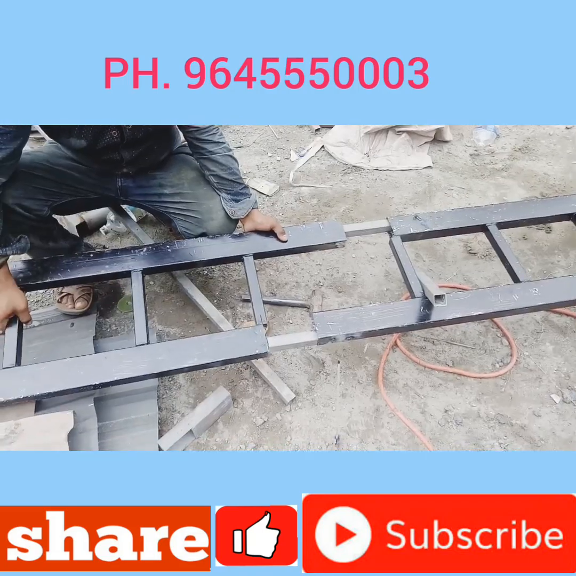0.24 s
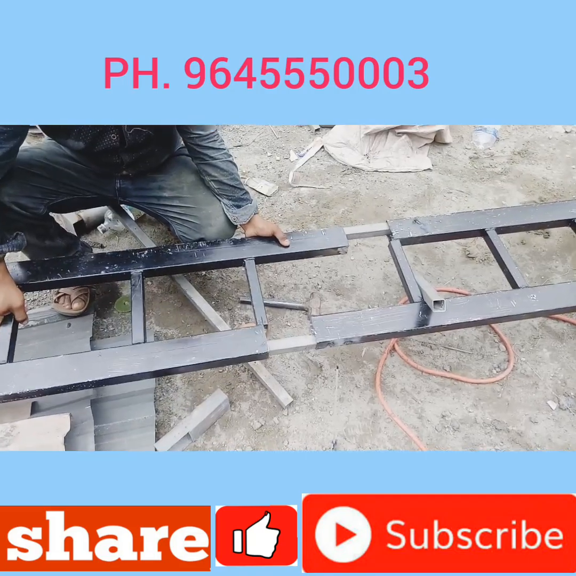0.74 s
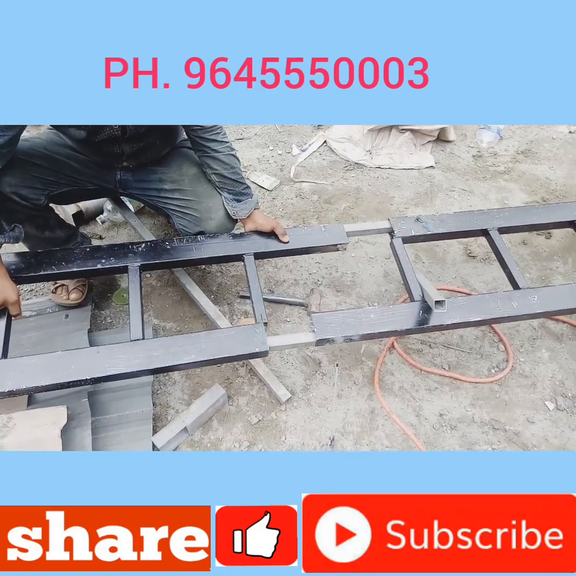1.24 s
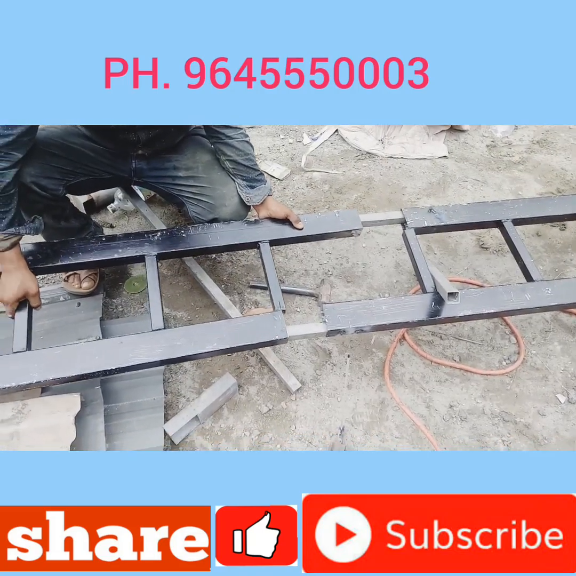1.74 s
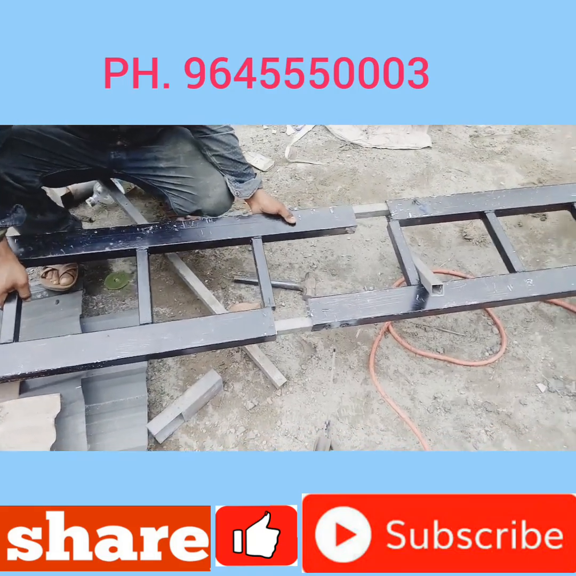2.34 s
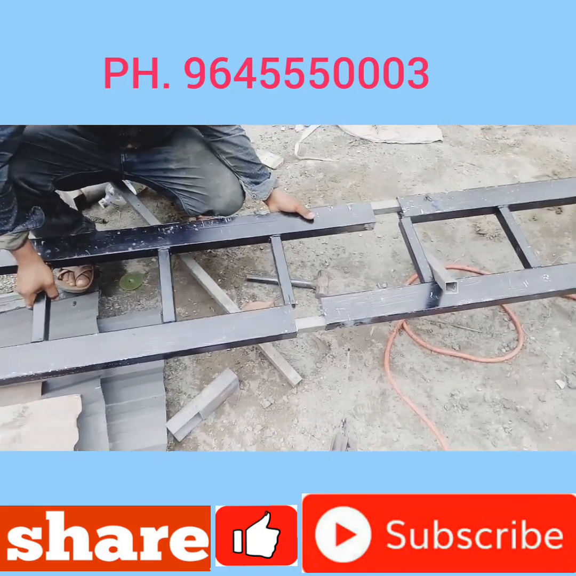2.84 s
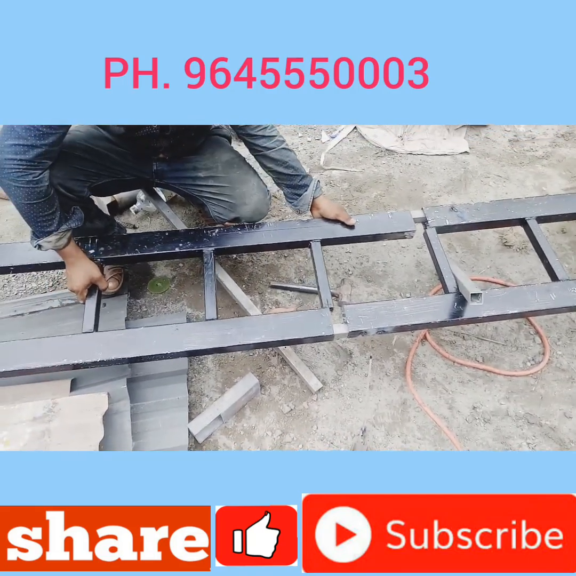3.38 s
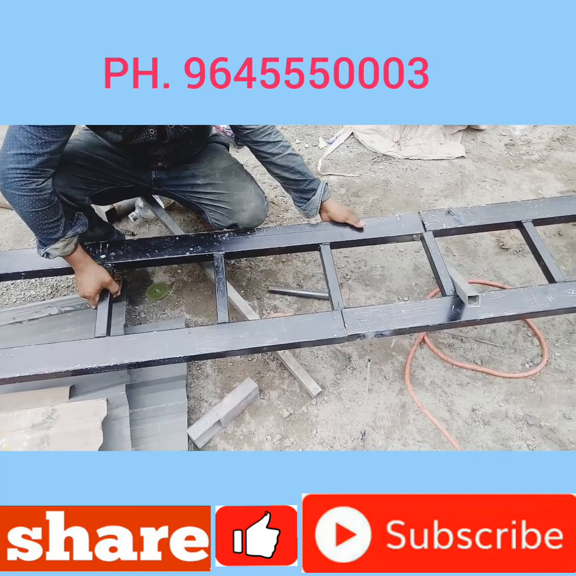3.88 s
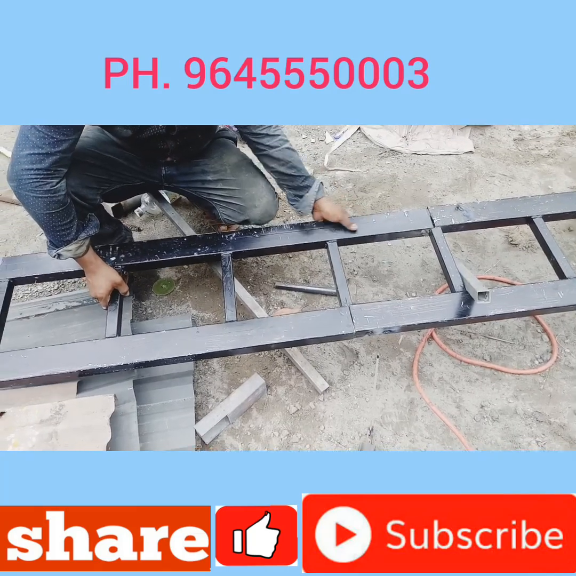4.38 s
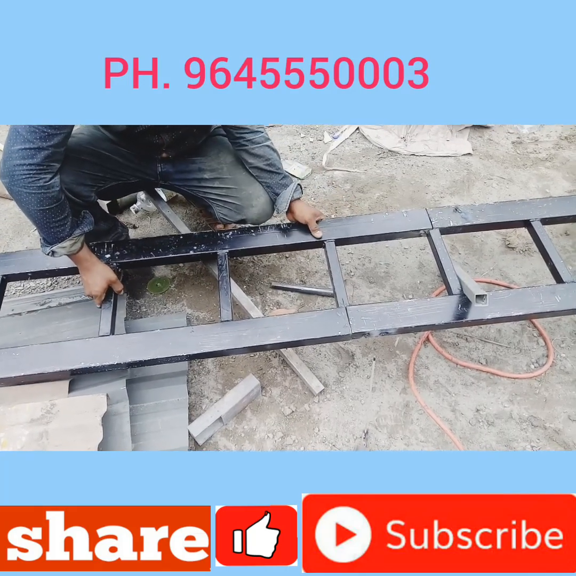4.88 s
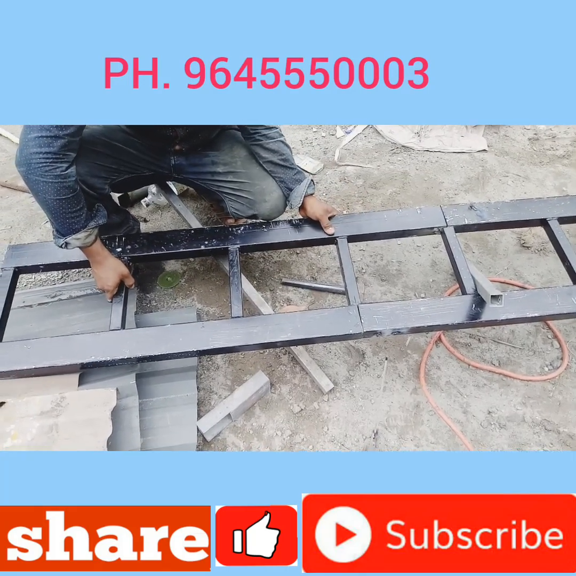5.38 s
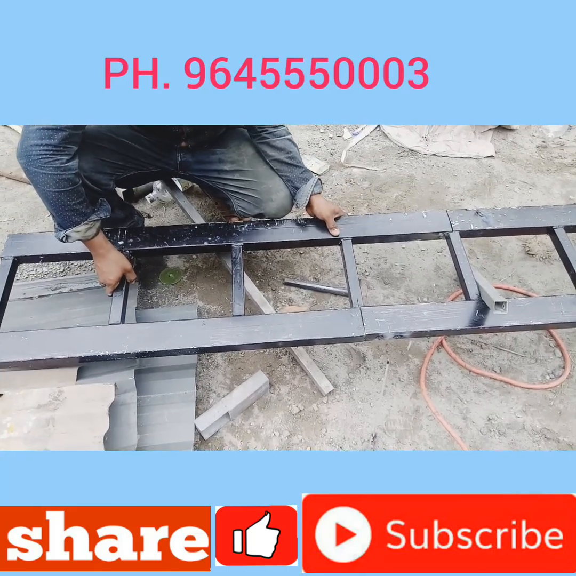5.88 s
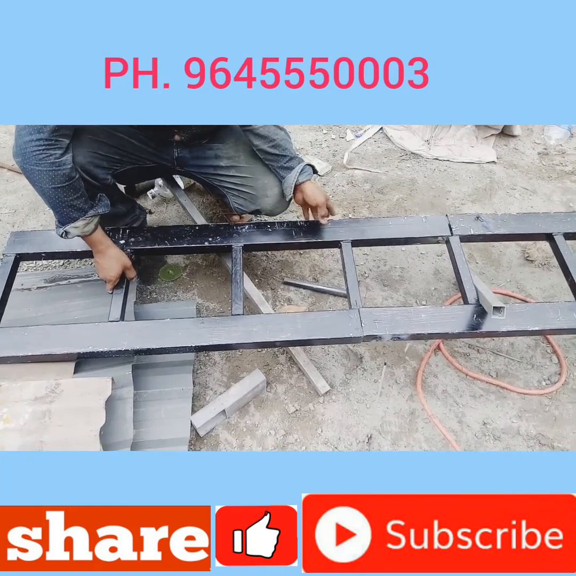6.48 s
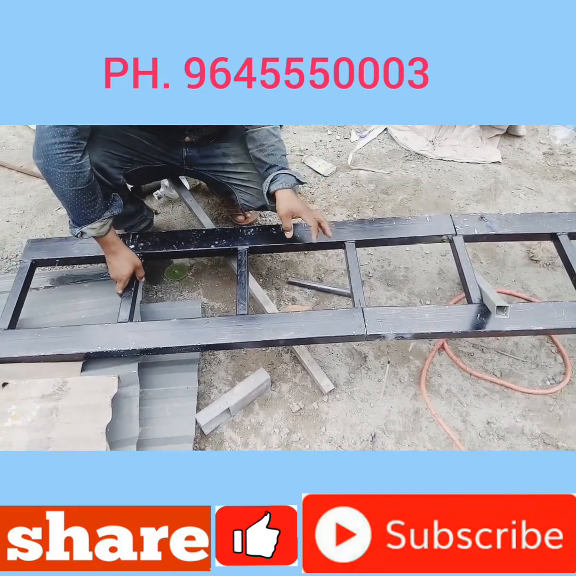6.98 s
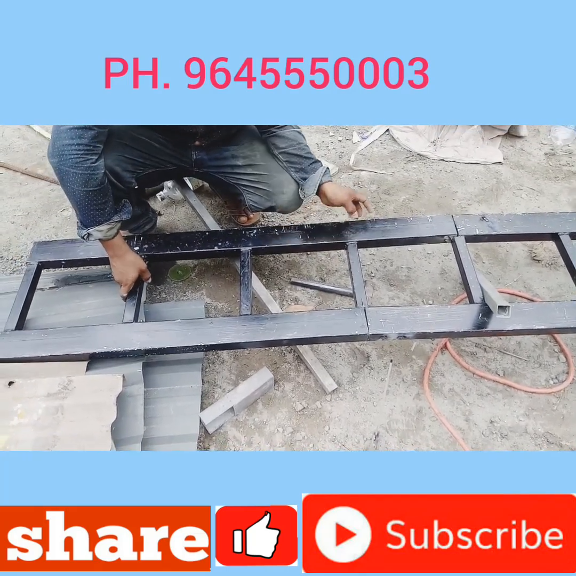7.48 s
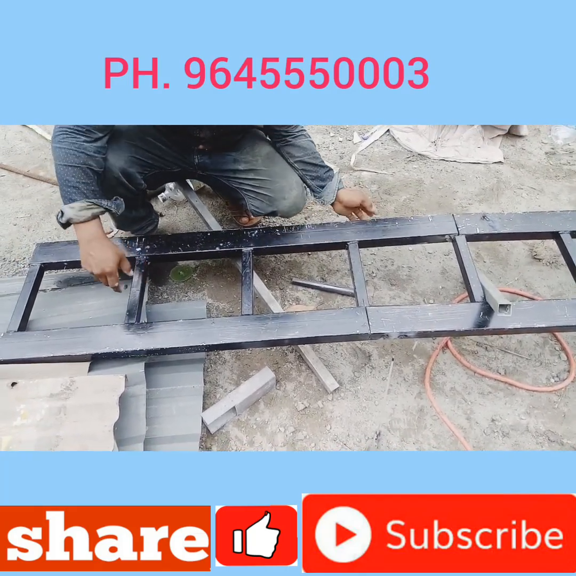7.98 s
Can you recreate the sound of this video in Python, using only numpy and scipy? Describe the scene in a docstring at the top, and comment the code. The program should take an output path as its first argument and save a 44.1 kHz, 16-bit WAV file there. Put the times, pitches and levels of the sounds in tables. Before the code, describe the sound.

An abrasive cut-off wheel whines and grinds through steel tube, lifts to race free for a second, then bites again with a long harsh squeal.

```python
"""In an open metal workshop, an abrasive wheel grinds through steel tube, a few metres off to one side.
The wheel whines on multiples of its speed and sags under load; it is lifted once, races free and bites again.
Whine and grit are built from the uneven rim turning; sparks hiss above, and a rough hum comes and goes.
The motor's air roar and the yard are shaped noise, louder while the wheel is lifted, over low road rumble.
A steel frame knocks twice near the microphone, as fading sines."""
import sys
import numpy as np
from scipy import signal
from scipy.fft import rfft, irfft, next_fast_len
from scipy.io import wavfile

SR = 44100
rng = np.random.default_rng(int(sys.argv[2]) if len(sys.argv) > 2 else 0)


def waveform_to_disk(signal):
    """Save audio, clipped to [-1, 1], as 16-bit WAV at the path in sys.argv[1]."""
    frames = np.transpose(np.atleast_2d(signal))
    scaled = np.clip(frames, -1, 1) * 32767
    samples = np.round(scaled).astype(np.int16)
    wavfile.write(sys.argv[1], SR, samples)


N = 362928   # length in samples

# how fast the wheel turns: t/s, speed/(turns per s)
WHEEL_SPEED = [(0.0, 158.0), (0.22, 152.6), (0.45, 159.3), (0.65, 171.5), (1.4, 184.4), (1.48, 185.1),
               (1.72, 181.2), (1.98, 173.6), (2.17, 159.8), (2.28, 154.5), (2.56, 157.3), (2.64, 155.2),
               (3.08, 154.7), (3.41, 152.6), (3.62, 149.8), (3.97, 147.6), (4.68, 149.8), (4.79, 147.7),
               (5.72, 148.1), (5.93, 149.8), (6.49, 147.8), (6.68, 149.4), (7.35, 151.0), (7.55, 149.6),
               (8.23, 149.1)]
# how uneven the rim is: multiple of the wheel speed, relative level/dB
RIM_BUMPS = [(2, -30.5), (13, -19), (15, -12.5), (17, -13.5), (18.5, -17), (21, -10), (22, -7.5), (24, -7),
             (30, -15.5), (32.5, -24), (46, -38.5)]


def wheel():
    """Whine and grit ring in the tube; sparks hiss above, swelling once and twice a turn."""
    # loudness while the wheel bites: t/s, cutting level/dB, spark hiss level/dB
    bite_levels = [(0, -18.5, -33.5), (.18, -21, -32.5), (.3, -18, -41), (.45, -17, -39),
                   (1.37, -21.5, -32.5), (1.55, -17.5, -32.5), (1.9, -16, -34), (2.15, -15.5, -29.5),
                   (2.34, -13.5, -38), (2.46, -11, -34), (2.7, -13.5, -35.5), (3.6, -13.5, -37),
                   (4.05, -13.5, -37), (4.8, -13, -38), (6.5, -15.5, -37.5), (7.2, -16.5, -40.5),
                   (7.35, -18, -42.5), (8.23, -16.5, -41)]
    # the wheel skips off the steel; a negative dip is a gain: t/s, dip/dB, half length/s
    bounces = [(1.439, 12, .007), (1.457, -4, .008), (1.472, 16, .009)]
    # grain noise under the whine, louder up to the second bite and again after 6.5 s: t/s, level/dB
    grit_levels = [(1.36, -10), (1.7, -17), (6.5, -15), (6.56, -11)]
    # how the tube rings: f/Hz, level/dB
    tube_tone = [(500, -19.5), (1200, -9.5), (1600, 4.5), (2000, -2.5), (2350, 3), (2950, -3.5), (3400, 1),
                 (4000, 0), (4500, 8.5), (5050, 5), (5800, 3), (6800, 10), (7500, -3.5)]
    # colour of the spark hiss: f/Hz, level/dB
    spark_tone = [(7500, -28), (8500, 5.5), (11000, 1.5), (13500, 6), (15500, 11.5)]
    lifted_cut_db, lifted_sparks_db = -8, -16   # change of level while lifted
    tremble_db, grit_clump_db, spark_flicker_db = .8, 1.2, 1.8   # size of the slow chance

    turns = turns_so_far() + .004 * drift(9.1)   # it runs a little ahead and behind as it snags
    cutting_db, sparks_db = in_time(bite_levels) + lifted() * [[lifted_cut_db], [lifted_sparks_db]]
    bite_db = tremble_db * drift(27.0) - bump(bounces)   # the hand's pressure trembles

    grit_db = in_time(grit_levels)[0] + grit_clump_db * drift(7.0)   # the grit comes in clumps
    whining = whine(turns, wander_db=3.5, waver_rad=.4, scatter=0.67)
    rim = whining + from_db(grit_db) * grit(turns, pulse_db=4)
    tube = rms_one(colour(rim, tube_tone))

    gate_db = 1.1 * np.cos(2 * np.pi * turns) + 3.7 * np.cos(4 * np.pi * turns)
    hiss = rms_one(colour(rng.standard_normal((2, N)), spark_tone))
    sparks = hiss * from_db(gate_db + spark_flicker_db * drift(22.0))
    return from_db(bite_db) * (from_db(cutting_db) * tube + from_db(sparks_db) * sparks)


def whine(turns, wander_db, waver_rad, scatter):
    """The rim's bumps come back every turn: a sine a multiple, changing slowly as the rim wears."""
    # neighbouring multiples that squeal together:
    # start/s, end/s, lowest multiple, highest multiple, rise/dB
    singing = [(0, 0.27, 17, 17, 25), (0, .22, 29, 29, 13.5), (0, 0.252, 22, 25, 9),
               (0.126, 0.203, 18, 18, 27), (.2, .46, 28, 28, 4), (0.322, 0.474, 21, 22, 12),
               (1.36, 1.74, 22, 28, 4), (1.73, 1.926, 23, 23, 9), (1.67, 1.923, 28, 28, 8),
               (1.753, 2.12, 26, 27, 6), (1.974, 2.042, 15, 15, 16), (2.02, 2.296, 16, 16, 15),
               (2.09, 2.307, 17, 17, 22), (1.992, 2.21, 20, 23, 7), (2.18, 2.346, 22, 24, 4),
               (2.205, 2.56, 27, 29, 2.5), (2.364, 3.95, 24, 24, -1), (3.346, 3.775, 23, 24, 5.5),
               (2.812, 3.17, 29, 30, 3), (2.8, 3.526, 15, 15, 10), (3.15, 4.0, 26, 26, 5),
               (3.2, 3.8, 17, 17, 1), (3.76, 4.615, 30, 30, 2), (4.194, 4.75, 16, 16, 7.5),
               (4.182, 4.62, 22, 22, 4.5), (4.4, 4.8, 21, 21, 8), (4.6, 5.75, 24, 24, -1),
               (4.603, 5.5, 17, 17, 6), (5.623, 6.022, 16, 16, 10.5), (5.66, 6.17, 21, 22, 8),
               (5.61, 6.223, 30, 30, 7.5), (6.21, 6.54, 17, 17, 13.5), (6.2, 6.545, 25, 27, 7),
               (6.525, 7.3, 30, 30, 6.5), (6.546, 8.3, 15, 15, 10.5), (7.316, 7.854, 29, 29, 10)]
    squeal_wander = .3   # share of the slow chance left while squealing: a squeal holds steadier
    waver_hz = 8         # how quickly the phase wavers

    squeals = []
    for start, end, lowest, highest, up_db in singing:
        squeals.append((round(lowest), round(highest), up_db, swell(start, end, 0.018)))
    out = np.zeros(N)
    for multiple in range(9, 46):
        level_db, loose = on_log(RIM_BUMPS, multiple), 1
        for lowest, highest, up_db, squeal in squeals:
            if lowest <= multiple <= highest:
                level_db = level_db + up_db * squeal
                loose = np.minimum(loose, 1 - (1 - squeal_wander) * squeal)
        # scatter 0 would line all the sines up, like one high spot on the rim
        start_turns = scatter * rng.random()
        phase = 2 * np.pi * (multiple * turns + start_turns) + waver_rad * drift(waver_hz)
        out += from_db(level_db + loose * wander_db * drift(4.7)) * np.sin(phase)
    return out / 5


def grit(turns, pulse_db):
    """Grains tearing steel: noise laid along the rim, so its colour rides on the speed; it throbs each turn."""
    steps_per_turn = 256
    along_rim = colour(spread_noise(.3, size=400000), RIM_BUMPS, per_unit=steps_per_turn)
    throb = from_db(pulse_db * np.cos(2 * np.pi * turns))
    passing = [np.interp(steps_per_turn * turns, np.arange(len(rim)), rim) for rim in along_rim]
    return throb * rms_one(np.array(passing))


def turns_so_far():
    """Turns the wheel has made: its speed added up over time."""
    return np.cumsum(in_time(WHEEL_SPEED)[0]) / SR


def lifted():
    """1 while the wheel is off the steel; it eases off and bites back at once."""
    off_s, on_s = .48, 1.36
    ease_s, bite_s = .04, .008   # half length of each change
    times = [off_s - ease_s, off_s + ease_s, on_s - bite_s, on_s + bite_s]
    return np.interp(np.arange(N) / SR, times, [0, 1, 1, 0])


def hum():
    """A rough tone that follows the motor's speed: a steady part plus slow chance in both phases."""
    # when the hum is heard: start/s, end/s, multiple of the wheel speed, level/dB
    hum_spells = [(0.55, 1.413, 3.07, -47), (2.26, 3.083, 3.1, -46), (3.855, 4.298, 3.17, -47),
                  (4.655, 5.302, 4.0, -46.5), (5.24, 5.763, 3.24, -45), (5.913, 6.703, 4.0, -46.5),
                  (6.78, 7.6, 3.1, -48)]
    width_hz, steady = 11, .7   # roughness of the tone, size of its steady part
    turns, out = turns_so_far(), np.zeros(N)
    along, across = drift(width_hz), drift(width_hz)
    for start, end, multiple, db in hum_spells:
        phase = 2 * np.pi * multiple * turns
        tone = (steady + along) * np.cos(phase) + across * np.sin(phase)
        out += from_db(db) * swell(start, end, 0.037) * tone
    return out


def knocks():
    """Each knock rings every mode of the steel frame with a strength of its own."""
    # when the frame is knocked: t/s, level of its middle mode/dB, hardness/(dB per octave)
    blows = [(1.35, -15, 8), (6.223, -26, -8)]
    # how the frame rings: f/Hz, level/dB, time to fall 60 dB/s
    frame_modes = [(900, -10, .12), (1400, 0, .018), (2000, -5, .015)]
    out = np.zeros(N)
    for s, peak_db, hard_db in blows:
        first = round(s * SR)
        t = np.arange(N - first) / SR
        for hz, level_db, t60 in frame_modes:
            octaves_up = np.log2(hz / frame_modes[1][0])   # a hard blow favours the high modes
            strength_db = peak_db + level_db + hard_db * octaves_up + rng.normal(0, 1)
            out[first:] += from_db(strength_db - 60 * t / t60) * np.sin(2 * np.pi * hz * t)
    return out


def roar():
    """Noise of cooling air, brushes and yard, fluttering at twice the mains frequency and by chance."""
    # colour of the motor with the yard: f/Hz, level/dB
    roar_tone = [(220, -16.5), (560, -5.5), (800, -7.5), (1200, -5), (1600, -2.5), (2230, 6), (2900, -3.5),
                 (4100, 4), (5000, -7.5), (6800, -13), (7500, -31), (11000, -23), (13500, -32)]
    flutter_db = 0.4 * np.cos(2 * np.pi * 100 * np.arange(N) / SR) + 2.0 * drift(19.7)
    return from_db(roar_db() + flutter_db) * rms_one(colour(spread_noise(0.25), roar_tone))


def roar_db():
    """Level of the motor and the yard: up with speed, up while the wheel is lifted, and in surges."""
    # the roar swells or sinks: t/s, rise/dB, half length/s
    surges = [(.15, -0.5, .15), (.3, 4, 0.051), (1.8, 0, 0.66), (2.38, 1.5, 0.034), (3.5, 4.5, 0.053),
              (4.77, 3, 0.098), (6.26, 5, 0.082), (7.3, 4, 0.72)]
    base_db, base_turns_per_s, db_per_turn_per_s, lifted_up_db = -27.5, 151.2, 0.1246, 6
    faster = in_time(WHEEL_SPEED)[0] - base_turns_per_s
    return base_db + db_per_turn_per_s * faster + lifted_up_db * lifted() + bump(surges)


def rumble():
    """Low noise of far traffic on the road, lumpy in level; it also follows the roar's level."""
    # loudness of the traffic: t/s, level against the roar/dB
    traffic_levels = [(0, -26), (.6, -21), (1.3, -21), (2.3, -28), (3.2, -21), (4.4, -17.5), (4.7, -23),
                      (8.23, -32)]
    # colour of the traffic: f/Hz, level/dB
    traffic_tone = [(36, -5), (65, -0.5), (81, 6.5), (100, -2.5), (120, 6.5), (165, 2), (200, 1)]
    level_db = in_time(traffic_levels)[0] + roar_db()
    return from_db(level_db) * rms_one(colour(spread_noise(0.073), traffic_tone))


def ports(x):
    """Direct sound lags at the right microphone port; each port also hears its own workshop echo."""
    # the two ports: f/Hz, lag of the right/rad, drop of the right/dB, direct share of the power
    port_table = [(30, 0.04, 2.5, .9), (860, .9, 3.5, .92), (1300, 2.8, 3.5, .9), (2240, 3.4, 9, .9),
                  (2760, 4.1, 6, .78), (2930, 3.7, 2, .68), (3360, .5, 2, .9), (4130, .6, 4, .9),
                  (4900, 2, -2.5, .88), (6400, 6.1, 1, .72), (7400, 6.4, 1, .6), (8400, 6.4, 4, .06),
                  (16000, 6.4, .5, .12)]
    echo_t60_s = .25   # time for the echo to fall 60 dB
    size = next_fast_len(N + SR)
    hz = np.arange(size // 2 + 1) * SR / size
    lag_rad = np.interp(hz, np.array(port_table)[:, 0], np.array(port_table)[:, 1])
    direct = np.clip(on_log(port_table, hz, column=3), 0, 1)

    t = np.arange(SR // 2) / SR
    tails = rng.standard_normal((2, len(t))) * from_db(-60 * t / echo_t60_s) * (t > .006)
    echo = rfft(tails / np.linalg.norm(tails, axis=1, keepdims=True), size)

    straight = np.array([1 + 0 * hz, np.exp(-1j * lag_rad)])   # left, right
    arrival = np.sqrt(direct) * straight + np.sqrt(1 - direct) * echo
    arrival[1] *= from_db(-on_log(port_table, hz, column=2))
    return irfft(arrival * rfft(x, size), size)[:, :N]


def spread_noise(own, size=N):
    """Noise for the two ports: a shared part and a share of the power that each hears alone."""
    shared, *alone = rng.standard_normal((3, size))
    own = np.clip(own, 0, 1)
    return np.sqrt(1 - own) * shared + np.sqrt(own) * np.array(alone)


def colour(x, spectrum, per_unit=SR):
    """Shape x by (frequency, dB) points, steeply closed outside them."""
    at = np.arange(x.shape[-1] // 2 + 1) * per_unit / x.shape[-1]
    below = (spectrum[0][0] / 2, spectrum[0][1] - 30)
    above = (spectrum[-1][0] * 2, spectrum[-1][1] - 30)
    gain = from_db(on_log([below, *spectrum, above], at))
    return irfft(rfft(x) * gain, x.shape[-1])


def drift(rate_hz):
    """Slow chance of spread 1: noise at every 64th sample through a double one-pole low-pass."""
    r = np.exp(-128 * np.pi * rate_hz / SR)
    noise = rng.standard_normal(N // 64 + 1002)
    slow = signal.lfilter([1], [1, -2 * r, r * r], noise)[1000:]   # skip the filter's start
    return np.interp(np.arange(N) / 64, np.arange(len(slow)), rms_one(slow))


def swell(start, end, fade):
    """Rises from 0 to 1 around start and falls back around end."""
    times = [start - fade, start + fade, end - fade, end + fade]
    return np.interp(np.arange(N) / SR, times, [0, 1, 1, 0])


def bump(rows):
    """Sum of bell-shaped swells, rows of (t/s, level/dB, half length/s)."""
    t = np.arange(N) / SR
    return sum(db * np.exp(-((t - s) / half) ** 2) for s, db, half in rows)


def in_time(rows):
    """Columns of a table that starts with time, one value per sample."""
    s, *columns = np.transpose(rows)
    return [np.interp(np.arange(N) / SR, s, c) for c in columns]


def on_log(points, at, column=1):
    """A table column read on a logarithmic axis."""
    table = np.array(points)
    return np.interp(np.log(at + 1e-6), np.log(table[:, 0]), table[:, column])


def from_db(db):
    """Decibels to gain."""
    return 10 ** (np.asarray(db) / 20)


def rms_one(x):
    """Scale to rms 1."""
    return x / np.sqrt(np.mean(x ** 2) + 1e-20)


def scene():
    """The wheel and the yard arrive from the side through the workshop; the frame is just below the microphone."""
    return ports(wheel() + roar() + rumble() + hum()) + knocks()


def record(dry):
    """Peaks are rounded, the top is cut steeply."""
    rounded = np.tanh(dry)
    low_pass = signal.cheby2(14, 80, 15900, fs=SR, output="sos")   # 80 dB down from 15900 Hz
    return signal.sosfilt(low_pass, rounded)


dry = scene()
out = record(dry)
waveform_to_disk(out)
```